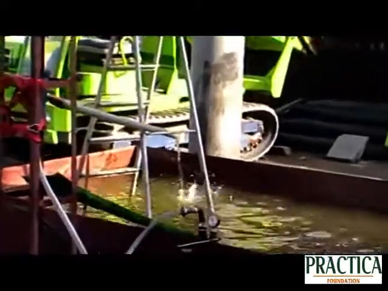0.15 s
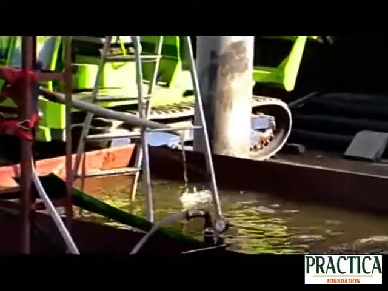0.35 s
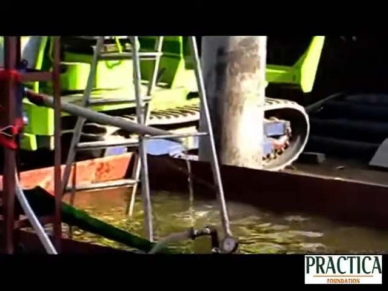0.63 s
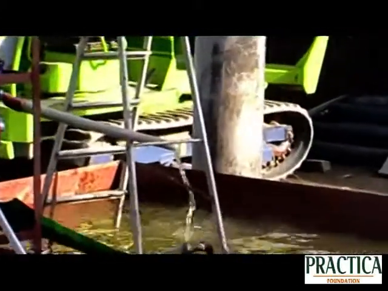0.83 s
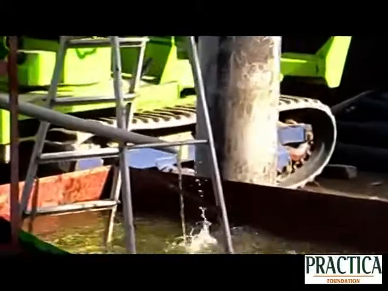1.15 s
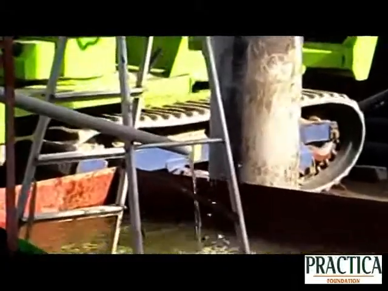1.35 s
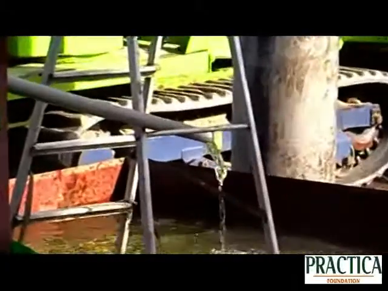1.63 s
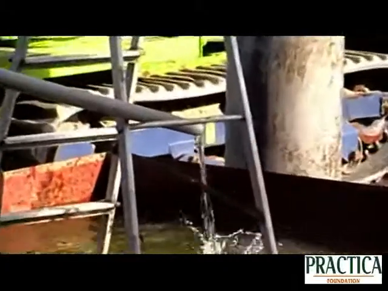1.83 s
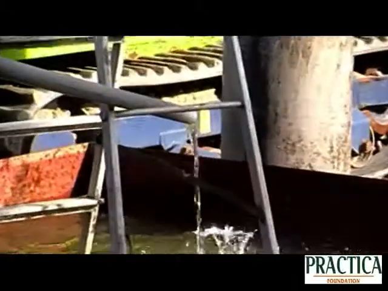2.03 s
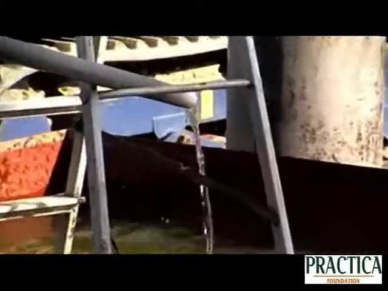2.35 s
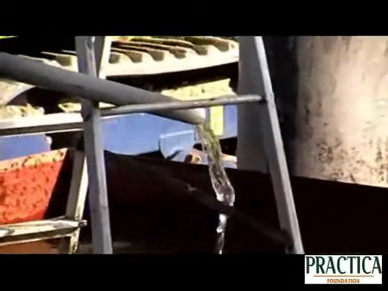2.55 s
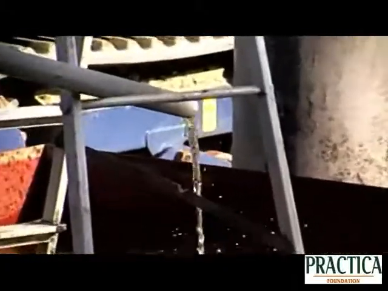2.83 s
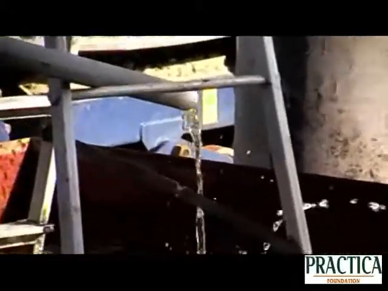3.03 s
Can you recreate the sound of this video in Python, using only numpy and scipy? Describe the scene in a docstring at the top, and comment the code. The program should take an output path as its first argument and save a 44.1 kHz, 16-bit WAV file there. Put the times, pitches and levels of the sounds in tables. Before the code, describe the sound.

Strong wind rumbles, thumps and crackles on an outdoor stereo microphone, easing mid-way then returning; behind it water trickles into a metal basin and a pump gives a bright metallic clack about once a second.

```python
"""Hand pump on a gusty day

Outdoors, gusts buffet the two microphone ports: shaped noise rumbles and rasps, clicks decay as pops,
and struck sine resonators thump. In front, water falls in a steel basin: noise trickles and spurts,
small resonators tick as drops, and rising sines gulp as bubbles. About once a second the pump clacks:
clicks ring the steel's resonances over a tail of noise."""
import sys
import numpy as np
from scipy import signal
from scipy.fft import rfft, irfft
from scipy.io import wavfile
from scipy.ndimage import uniform_filter1d

SR = 44100
rng = np.random.default_rng(int(sys.argv[2]) if len(sys.argv) > 2 else 0)


def store_pcm(level_fs):
    """Save levels as 16-bit WAV."""
    pcm = np.round(np.clip(level_fs, -1, 1) * 32767).astype(np.int16)
    wavfile.write(sys.argv[1], SR, np.atleast_2d(pcm).T)


N = 141120  # samples, 3.2 s

# Levels in the tables are relative: each layer adds its own trim.
# Deep thuds of the hardest buffets: start_s, level_db, pitch_hz
THUMPS = [(0.386, -5, 125), (0.807, -2, 180), (0.822, -0.5, 204), (1.026, -2, 245.6), (1.037, -3.5, 129),
          (2.305, -7, 209.6), (2.497, -10, 166.6), (2.514, -9, 179.6)]
# Wind at the ports: time_s, rumble_db, rasp_db, upper_over_whole_rumble_db
GUSTS = [(0.0, -36, -51.5, -4.5), (0.16, -24.5, -38, -6), (0.22, -34, -34.5, -3),
         (0.248, -14.5, -25.5, -0.5), (0.27, -43, -33, 9.5), (0.3, -13.5, -27.5, -3.5),
         (0.331, -12, -29.5, -15), (0.36, -21, -32.5, 4.5), (0.4, -10.5, -27.5, -10.5),
         (0.42, -14.5, -34.5, 0), (0.5, -16.5, -37, -17), (0.53, -17.5, -42, -4), (0.591, -19.5, -29, -2),
         (0.731, -26.5, -45.5, -8.5), (0.83, -8.5, -19.5, 2), (0.85, -15.5, -29.5, -1.5),
         (0.93, -26.5, -35, 5.5), (0.98, -19.5, -37.5, -2.5), (1.02, -16.5, -26, 5), (1.03, -6, -16.5, 3),
         (1.048, -19, -32.5, -7), (1.098, -16.5, -23.5, 3.5), (1.121, -20.5, -37.5, -4.5),
         (1.159, -13.5, -32.5, -6), (1.21, -28, -46, -3.5), (1.35, -29, -36.5, -3.5), (1.41, -37, -51, -10),
         (1.45, -29, -50, -20), (1.5, -44.5, -54, 2), (1.84, -32, -53.5, -7.5), (1.96, -18, -36.5, -6),
         (2.02, -27, -37, -24), (2.049, -22.5, -43, 0), (2.101, -25, -32.5, 0), (2.149, -21.5, -34, -24),
         (2.162, -13.5, -18.5, -15.5), (2.25, -22.5, -24.5, -6), (2.32, -18.5, -18.5, 1),
         (2.352, -23.5, -41, 1.5), (2.371, -18.5, -22.5, 4.5), (2.409, -15.5, -23.5, -2),
         (2.451, -27.5, -41.5, -5.5), (2.5, -14, -26.5, -1), (2.521, -9, -18, -12),
         (2.541, -15.5, -44, -11), (2.554, -15.5, -19.5, -13), (2.58, -28.5, -46.5, -6),
         (2.701, -12.5, -31.5, -3), (2.75, -27.5, -46, -9), (2.801, -34, -39.5, 4),
         (2.819, -20.5, -25, -22), (2.859, -18, -29, 0), (2.89, -11, -30.5, -11), (2.961, -21.5, -33, -2.5),
         (2.989, -30.5, -43, -3), (3.2, -35.5, -43, -9.5)]
# Rumble colour, shared by both ports: frequency_hz, density_db
RUMBLE_COLOUR = [(21, -50), (35, -16), (85, -0.5), (103, 4.5), (255, -5.5), (446, -17), (600, -27.5),
                 (780, -39.5), (1100, -88)]
# Rasp colour, in step at both ports: frequency_hz, density_db
RASP_MID_COLOUR = [(150, -6.5), (250, -2.5), (418, -9), (1040, -14), (1260, -19.5), (2810, -27),
                   (5000, -81), (8000, -105)]
# Rasp colour, opposed between the ports: frequency_hz, density_db
RASP_SIDE_COLOUR = [(24, -52), (40, -24), (434, -3), (576, -2), (935, 4), (1370, -17), (1520, -3),
                    (5000, -50.5), (8000, -77.5)]
# Sharp pops where an eddy hits a port: start_s, level_db, left_over_right_db
POPS = [(0.242, -17, 15), (0.277, -18.5, 15), (0.357, -5.5, 5.5), (0.386, -6, -2), (0.413, -12, 3),
        (0.602, -29, -1), (0.79, -11, 9), (0.89, -7, 2.5), (1.021, -17, -18), (1.092, -29, 2.0),
        (1.961, -8.5, 4), (2.159, -6.5, -2), (2.196, -9, -2), (2.299, -2, 8), (2.369, -18, 3),
        (2.495, -9, 1), (2.508, -19, 7), (2.521, -13, -11), (2.545, -9.5, 6), (2.663, -15.5, 8),
        (2.68, -9.5, 3), (2.697, -11.5, 5), (2.819, -13, 19.5)]
# Trapped air gulping upward: start_s, level_db, start_pitch_hz
BUBBLES = [(.126, -30, 2750), (.321, -31, 2550), (.823, -15, 790), (.853, -30, 920), (3.113, -35, 1600)]
# Colour of the steady stream: frequency_hz, density_db
TRICKLE_COLOUR = [(120, -30), (200, 0.5), (448, 1), (586, 2.5), (727, -7.5), (809, 1), (1040, -5.5),
                  (1980, -11.5), (2740, -3.5), (3650, -24), (13000, -29), (14500, -63)]
# Spurts hitting the basin; the row at 1.023 is the harsh treble of a gust overloading the microphone:
# start_s, level_db, hold_s, brightness_db_per_octave, low_splash_db
SPLASHES = [(0.036, -31, 0.01, 2.5, -8), (0.065, -33, 0.037, -0.5, 0.3), (0.105, -32.5, 0.027, 6, -5),
            (0.122, -33, 0.011, -8, 8), (0.1616, -31, 0.037, 1, 5), (0.2925, -31.5, 0.011, 3.5, 3.5),
            (0.318, -35.5, 0.043, 0.1, -3), (0.703, -36.5, 0.0083, -7.5, -19),
            (0.759, -28.5, 0.0055, 6, -5), (0.901, -44, 0.025, 12, -1), (0.973, -31, 0.017, 8.5, -10),
            (1.007, -31.5, 0.0089, -13, 5.5), (1.023, -23.5, 0.0096, -2, 5), (1.128, -30.5, 0.027, 2, 0.3),
            (1.217, -37, 0.035, -1, 4.5), (1.434, -33, 0.0096, -2, -15), (1.486, -33.5, 0.0072, 6, -30),
            (1.545, -54.5, 0.013, -2, 23), (1.615, -36, 0.018, -1, -2.5), (1.712, -33, 0.0076, 7, -19),
            (1.8, -30.5, 0.015, 12.5, -5), (1.812, -44.5, 0.0062, 11, 6), (1.885, -33.5, 0.051, 4, 3),
            (1.942, -41, 0.025, -8, 7), (2.0243, -36.5, 0.018, 1, 3), (2.101, -31, 0.012, -1, -5.5),
            (2.154, -41, 0.066, 7, 15), (2.6813, -31.5, 0.021, 7, -27), (2.773, -33.5, 0.027, 2, -1.5),
            (2.8034, -28.5, 0.054, 0, -1.5), (2.946, -35.5, 0.02, 3, 6.5), (3.044, -37.5, 0.034, 0, 7)]
# Colour of the spurts: frequency_hz, density_db
SPLASH_COLOUR = [(900, -29), (1600, 3.5), (2200, -7.5), (2850, 5), (3350, -13), (4030, -23.5), (5590, -15),
                 (8000, -17.5), (11500, -20), (13500, -26.5), (14500, -40)]
# Stereo width of the water and pump noise: frequency_hz, side_over_mid_db
WATER_WIDTH = [(60, -24), (200, -33), (370, -26.5), (680, -23), (1260, -13), (2310, -20.5), (4240, -0.5),
               (7790, -8), (14300, -14)]
# Pump blows: start_s, level_db
CLACKS = [(0.394, -18), (1.3064, -18.5), (2.2159, -19.5), (3.1339, -20)]
# Resonances of the struck steel: pitch_hz, width_hz, level_db
STEEL_MODES = [(4430, 90, -8), (4870, 60, -8), (5980, 45, -3), (6113, 40, 0), (6331, 45, 0), (6411, 45, -1),
               (6783, 45, 0), (7053, 45, -1), (7250, 50, -2), (7454, 45, -1), (7940, 45, -1),
               (8200, 60, -2), (8620, 60, -3)]
# Colour of the rattle after a blow: frequency_hz, density_db
TAIL_COLOUR = [(880, -57), (1500, -3), (2230, -9.5), (2810, 1.5), (4030, -23), (4500, -9), (5670, -19.5),
               (6590, -7), (8200, -3.5), (9550, -14.5), (13600, -20.5), (14500, -45)]
# Time for the rattle to fall 60 dB: frequency_hz, decay_s
TAIL_T60 = [(2000, 0.44), (4500, 0.14), (6500, 0.54), (8500, 0.15), (12000, 0.16)]
# Port colour: slight cuts, deepest near 3300 Hz: frequency_hz, gain_db
PORT_COLOUR = [(2300, -0.3), (2860, -1.5), (3300, -5.5), (4100, -0.5), (4600, -1.5)]
# Difference in colour between the ports: frequency_hz, left_over_right_db
PORT_BALANCE = [(60, 1.5), (200, -1.0), (370, -2.5), (680, -1), (1260, 2), (2310, -2.5), (4240, 1),
                (7790, 1.5), (14300, 0)]

# Deep air and thumps
DEEP_DB, DEEP_HZ, THUMP_T60_S = -46, 72, 0.12
# Wind rumble: lumps in the turbulence, and the share of chance swells taken out
EDDIES_PER_S, EDDY_DB, EVENNESS = 64, 2, 0.3
RUMBLE_TRIM_DB, UPPER_RUMBLE_HZ, UPPER_REF_DB = -1.5, 160, -4.5
# Wind rasp: stronger is brighter, by these dB per dB per octave above 800 Hz
RASP_REF_DB, MID_BRIGHTEN, SIDE_BRIGHTEN = -17.5, 0.24, 0.41
RASP_TRIM_DB, FLUTTER_DB = -1.5, 2.5
SIDE_SWING = 0.25  # extra dB per dB of rasp in the opposed part
POP_DB, POP_T60_S = -12.5, 0.039
CRACKLES_PER_S, CRACKLE_DB, CRACKLE_T60_S = 70, 0.5, 0.019  # level over the rasp
# Bubbles: length in cycles of the start pitch
BUBBLE_CYCLES, BUBBLE_RISE_HZ_PER_S = 16, 14000
# Water; drops and spray fall 60 dB in the given number of cycles
TRICKLE_DB, TRICKLE_PATCH_DB = -43.5, 2
SPLASH_DB, SPLASH_ATTACK_S, SPLASH_T60_S = -8.5, 0.00056, 0.086
DROPS_PER_S, DROP_DB, DROP_CYCLES = 80, -61, 1.7
SPRAY_PER_S, SPRAY_DB, SPRAY_CYCLES = 140, -63.5, 44
# Pump
BOUNCE_S, BOUNCE_DB = 0.012, -8.5
RATTLES_PER_S, RATTLE_T60_S = 690, 0.2
STRIKE_DB, RING_DB = 14, -28
TAIL_DB, TAIL_PATCH_DB = -16, 1.5
CRACK_DB, CRACK_T60_S = -10.5, 0.018
# Microphone: overload in sample units, and edges of the treble
OVERLOAD, ROLLOFF_HZ, CUTOFF_HZ = 0.96, 13900, 14900


def amp(db):
    """dB to gain."""
    return np.exp(np.asarray(db) * np.log(10) / 20)


def rms_one(x):
    """Scale to rms 1."""
    return x / np.sqrt(np.mean(x ** 2) + 1e-20)


def at_hz(points, hz):
    """Read a table on a log-frequency axis."""
    p = np.array(points)
    return np.interp(np.log(hz), np.log(p[:, 0]), p[:, 1])


def drift(rate):
    """Random wander of spread 1, slowed by two equal low-passes at rate (Hz)."""
    r = np.exp(-40 * np.pi * rate / SR)  # computed at every 20th sample
    noise = rng.standard_normal(N // 20 + 1002)
    slow = signal.lfilter([1], [1, -2 * r, r * r], noise)[1000:]
    return np.interp(np.arange(N) / 20, np.arange(len(slow)), rms_one(slow))


def bands(spectrum):
    """Noise of this colour and rms 1, split into overlapping half-octave bands: (centre Hz, band)."""
    hz = np.arange(N // 2 + 1) * SR / N + 1e-3
    low_hz, high_hz = spectrum[0][0], spectrum[-1][0]
    inside = (hz > low_hz) & (hz < high_hz)
    x = rfft(rng.standard_normal(N)) * amp(at_hz(spectrum, hz)) * inside
    x = x / np.sqrt(np.mean(irfft(x, N) ** 2))
    first_octave = np.floor(2 * np.log2(low_hz)) / 2
    for centre in 2 ** np.arange(first_octave, np.log2(high_hz) + 0.5, 0.5):
        octaves_off = np.clip(np.log2(hz / centre), -0.5, 0.5)
        yield centre, irfft(x * np.cos(np.pi * octaves_off) ** 2, N)


def ring(clicks, hz, t60):
    """A two-pole resonator: each click sets a decaying sine ringing."""
    r, w = amp(-60 / (t60 * SR)), 2 * np.pi * hz / SR
    return signal.lfilter([0, np.sin(w)], [1, -2 * r * np.cos(w), r * r], clicks + 1e-18)


def fade(clicks, t60):
    """Each click starts an exponential decay."""
    return signal.lfilter([1], [1, -amp(-60 / (t60 * SR))], clicks + 1e-18)


def impulses(s, gain):
    """Clicks of given heights at given times."""
    out = np.zeros(N)
    out[np.minimum((np.asarray(s) * SR).astype(int), N - 1)] = gain
    return out


def soften(x, size):
    """Round off sudden edges with a smooth window of size samples."""
    window = np.hanning(size)
    return signal.lfilter(window / window.sum(), 1, x)


def even(x):
    """Partly flatten the chance swells of a noise, followed over about 20 ms."""
    power = uniform_filter1d(uniform_filter1d(x ** 2, size=800), size=800) + 1e-20
    return x * (np.mean(power) / power) ** (EVENNESS / 2)


def wide(spectrum, envelope):
    """Stereo noise from independent mid and side, whose bands follow envelope(hz)."""
    mid, side = 0, 0
    for (hz, mid_band), (_, side_band) in zip(bands(spectrum), bands(spectrum)):
        gain = envelope(hz)
        mid = mid + gain * mid_band
        side = side + gain * side_band * amp(at_hz(WATER_WIDTH, hz))
    return np.array([mid + side, mid - side])


def thumps():
    """Buffets as short pitched thuds of decaying sine, over a steady deep murmur of air."""
    thuds = sum(ring(impulses([s], amp(db)), hz, THUMP_T60_S) for s, db, hz in THUMPS)
    deep_band = signal.butter(2, [DEEP_HZ / 2, DEEP_HZ], "band", fs=SR, output="sos")
    deep = signal.sosfilt(deep_band, rng.standard_normal(N))
    return soften(thuds, size=60) + amp(DEEP_DB) * rms_one(deep)


def rumble(rumble_db, upper_db, eddies):
    """Low turbulence common to both ports, each band lumpy in its own way."""
    out = 0
    for hz, band in bands(RUMBLE_COLOUR):
        lumps_db = 0.79 * eddies + 0.78 * drift(31)
        tilt_db = (hz > UPPER_RUMBLE_HZ) * (upper_db - UPPER_REF_DB)
        out = out + even(band) * amp(lumps_db + tilt_db)
    return amp(rumble_db + RUMBLE_TRIM_DB) * out


def pops_and_crackle(rasp_db):
    """Decaying bursts of level at each port: placed pops, and small random ones that follow the rasp."""
    s, db, pan_db = np.transpose(POPS)
    pops = [fade(impulses(s, amp(db + POP_DB + sign * pan_db / 2)), POP_T60_S) for sign in (1, -1)]
    hits = (rng.random((2, N)) < CRACKLES_PER_S / SR) * rng.random((2, N))
    crackle = fade(hits, CRACKLE_T60_S) * amp(rasp_db + CRACKLE_DB)
    return soften(pops + crackle, size=80)


def rasp(spectrum, brighten, level_db):
    """Rough turbulence whose treble grows faster than its level."""
    out = 0
    for hz, band in bands(spectrum):
        band = band * amp(2.4 * drift(45))
        if hz > 800:
            band = band * amp(brighten * np.log2(hz / 800) * (level_db - RASP_REF_DB))
        out = out + band
    return amp(level_db) * out


def wind():
    """Lumpy turbulence: a common rumble, and a rasp with pops and crackle that differs between the ports."""
    s, *columns = np.transpose(GUSTS)
    rumble_db, rasp_db, upper_db = (np.interp(np.arange(N) / SR, s, c) for c in columns)
    eddies = EDDY_DB * drift(EDDIES_PER_S)
    steady_rasp = amp(rasp_db + RASP_TRIM_DB + 0.5 * eddies + FLUTTER_DB * drift(240))
    level_db = 20 * np.log10(steady_rasp + pops_and_crackle(rasp_db))
    in_step = rasp(RASP_MID_COLOUR, MID_BRIGHTEN, level_db)
    opposed = rasp(RASP_SIDE_COLOUR, SIDE_BRIGHTEN, level_db) * [[1], [-1]]
    opposed = opposed * amp(SIDE_SWING * (rasp_db - RASP_REF_DB))
    return rumble(rumble_db, upper_db, eddies) + in_step + opposed


def bubbles():
    """Trapped air as sines: each bubble swells and dies while its pitch climbs."""
    out = np.zeros(N + SR)
    for s, db, hz in BUBBLES:
        t = np.arange(int(BUBBLE_CYCLES / hz * SR)) / SR
        swell = np.sin(np.pi * np.sqrt(t / t[-1]))
        phase = 2 * np.pi * t * (hz + BUBBLE_RISE_HZ_PER_S * t / 2)
        out[int(s * SR):][:len(t)] += amp(db) * swell * np.sin(phase)
    return out[:N]


def droplets(per_s, db, cycles, low_hz, high_hz):
    """Random drops of uneven size, each ringing a few cycles at one of twelve pitches."""
    sizes = amp(0.87 * np.minimum(rng.exponential(1, N), 4)) * (rng.random(N) < per_s / SR)
    dealt = rng.integers(0, 12, N)
    pitches = np.geomspace(low_hz, high_hz, 12)
    rings = sum(ring(sizes * (dealt == k), hz, cycles / hz) for k, hz in enumerate(pitches))
    band = signal.butter(3, [low_hz / 1.3, high_hz * 1.1], "band", fs=SR, output="sos")
    return amp(db) * rms_one(signal.sosfilt(band, rings))


def trickle(together):
    """The steady stream: noise whose bands wander partly together, partly alone."""
    def patches(hz):
        return amp(TRICKLE_DB + TRICKLE_PATCH_DB * (0.58 * together + drift(19.0)))
    return wide(TRICKLE_COLOUR, patches)


def splashes():
    """Spurts, and one harsh overload, as sputtering noise that starts fast, holds and fades."""
    s, db, hold_s, tilt_db, low_db = np.transpose(SPLASHES)
    t = np.arange(0, N, 16) / SR - s[:, None]  # one row a burst, every 16th sample
    attack = np.clip(t / SPLASH_ATTACK_S, 0, 1)
    shape = attack * amp(-60 * np.clip(t - hold_s[:, None], 0, 1) / SPLASH_T60_S)
    sputter = drift(120)

    def bursts(hz):
        colour_db = tilt_db * np.log2(hz / 7000) if hz > 3500 else low_db
        level = np.repeat(amp(db + SPLASH_DB + colour_db) @ shape, 16)[:N]
        return soften(level, size=40) * amp(2.5 * sputter + 2.5 * drift(25))
    return wide(SPLASH_COLOUR, bursts)


def water():
    """Spurts and a patchy trickle of noise, with single drops and fine treble spray ringing briefly."""
    drops = droplets(DROPS_PER_S, DROP_DB, DROP_CYCLES, 1550, 2070)
    spray = droplets(SPRAY_PER_S, SPRAY_DB, SPRAY_CYCLES, 4940, 16500)
    return splashes() + trickle(drift(46.4)) + drops + spray


def pump():
    """Each clack: a crack, loose parts chattering on the ringing steel, and a patchy tail dying by band."""
    s, db = np.transpose(CLACKS)
    s, db = np.append(s, s + BOUNCE_S), np.append(db, db + BOUNCE_DB)  # each blow rebounds once
    blows = soften(impulses(s, amp(db)), size=40)
    grain = drift(300)
    chatter = fade(blows, RATTLE_T60_S) * (rng.random(N) < RATTLES_PER_S / SR)
    rings = 0
    for hz, width_hz, level_db in STEEL_MODES:
        strikes = impulses(s, amp(db + STRIKE_DB) * rng.standard_normal(len(s)))
        hits = chatter * rng.standard_normal(N) + strikes
        t60 = np.log(1000) / np.pi / width_hz  # a narrow resonance rings longer
        rings = rings + ring(hits * amp(level_db + RING_DB), hz, t60)

    def crack_and_tail(hz):
        patches = amp(TAIL_DB + TAIL_PATCH_DB * (drift(66) + grain))
        tail = patches * fade(blows, at_hz(TAIL_T60, hz))
        return tail + amp(CRACK_DB) * fade(blows, CRACK_T60_S)
    return rings + wide(TAIL_COLOUR, crack_and_tail)


def scene():
    """Wind on the ports, water and pump in front."""
    return thumps() + wind() + bubbles() + water() + pump()


def record(dry):
    """Each port has its colour; peaks are rounded, the deepest bass is cut, the top rolls off and is cut."""
    hz = np.arange(N // 2 + 1) * SR / N + 1
    lean = at_hz(PORT_BALANCE, hz) / 2
    x = irfft(rfft(dry) * amp(at_hz(PORT_COLOUR, hz) + [lean, -lean]), N)
    x = x / (1 + (x / OVERLOAD) ** 4) ** 0.25
    x = signal.sosfilt(signal.butter(2, 42, "high", fs=SR, output="sos"), x)
    x = signal.sosfilt(signal.cheby2(9, 16, ROLLOFF_HZ, fs=SR, output="sos"), x)
    return signal.sosfilt(signal.cheby2(12, 60, CUTOFF_HZ * 1.03, fs=SR, output="sos"), x)


dry = scene()
out = record(dry)
store_pcm(out)
```